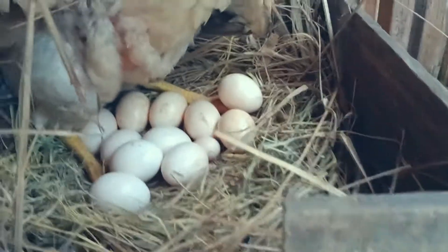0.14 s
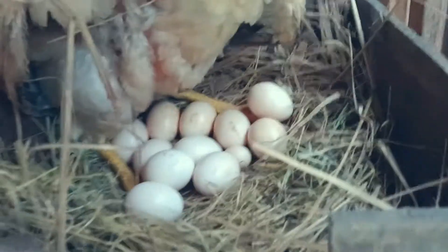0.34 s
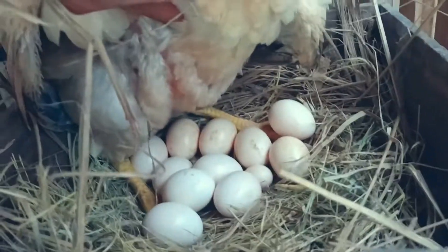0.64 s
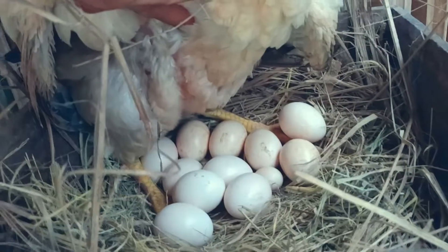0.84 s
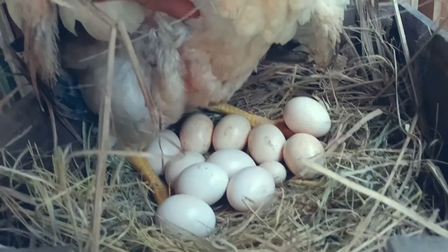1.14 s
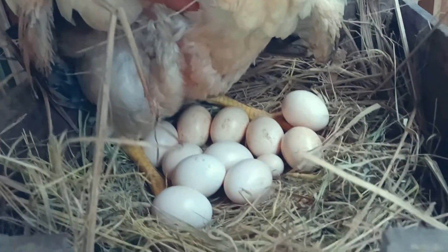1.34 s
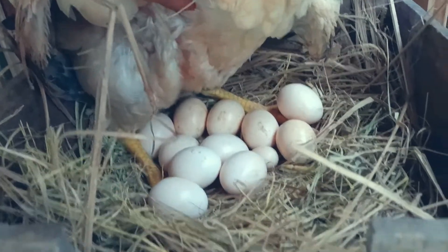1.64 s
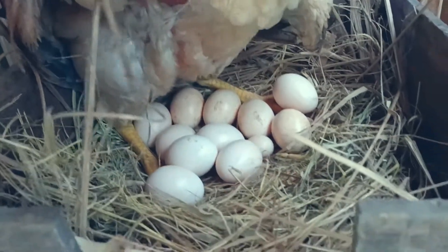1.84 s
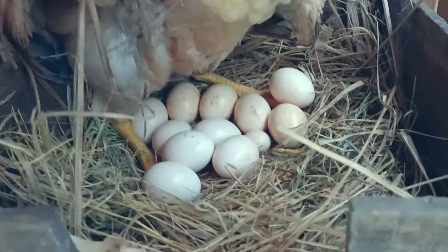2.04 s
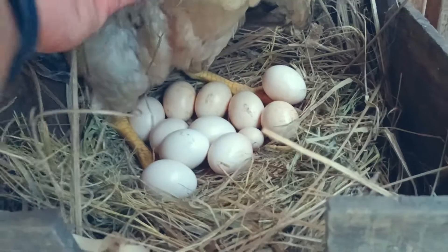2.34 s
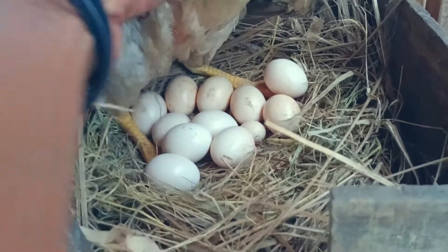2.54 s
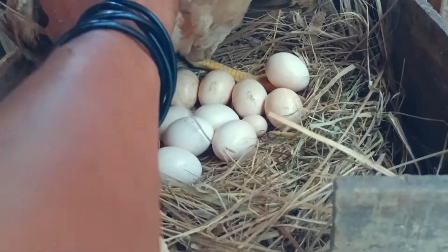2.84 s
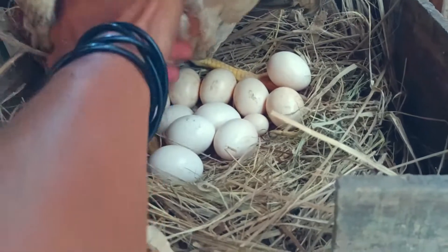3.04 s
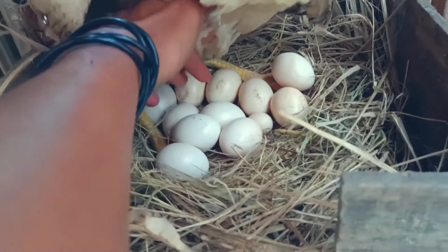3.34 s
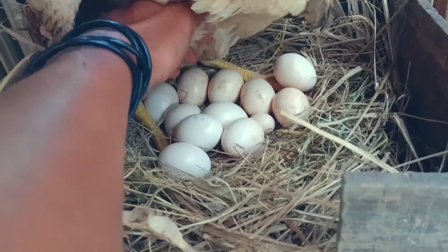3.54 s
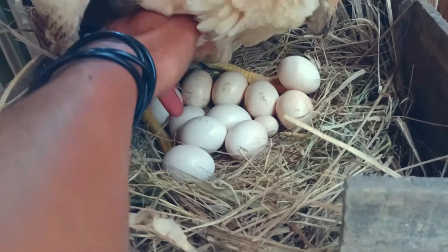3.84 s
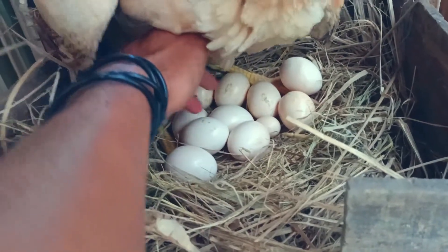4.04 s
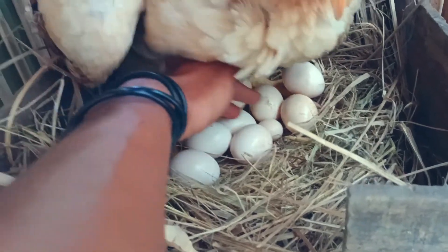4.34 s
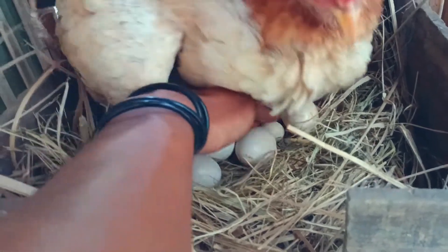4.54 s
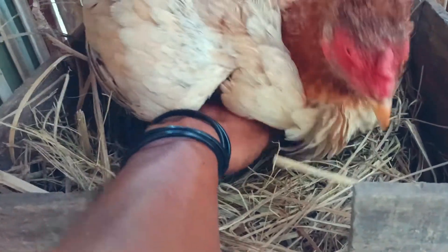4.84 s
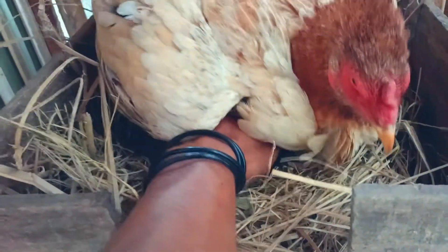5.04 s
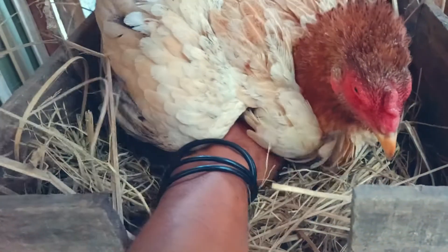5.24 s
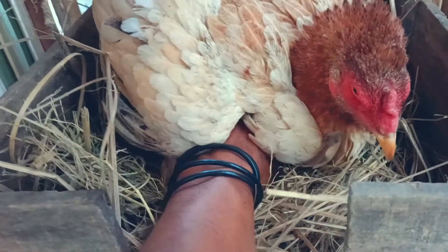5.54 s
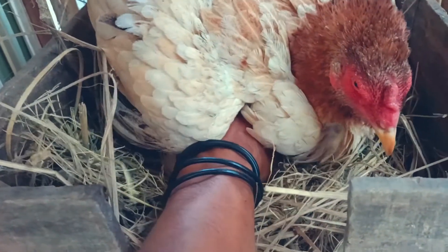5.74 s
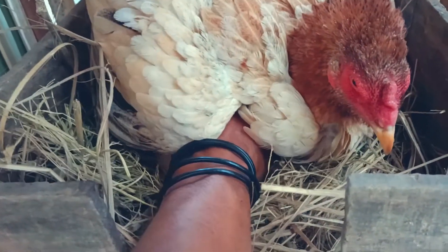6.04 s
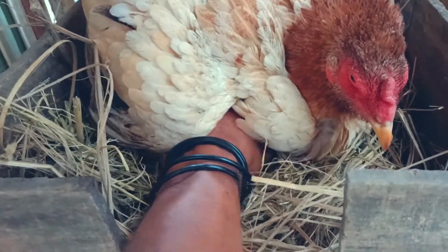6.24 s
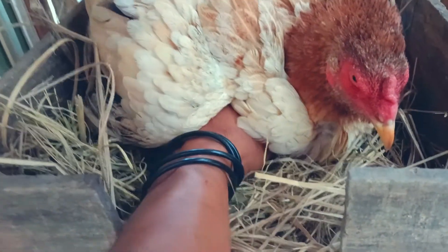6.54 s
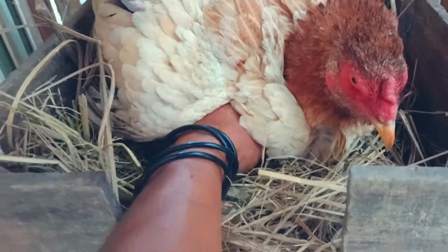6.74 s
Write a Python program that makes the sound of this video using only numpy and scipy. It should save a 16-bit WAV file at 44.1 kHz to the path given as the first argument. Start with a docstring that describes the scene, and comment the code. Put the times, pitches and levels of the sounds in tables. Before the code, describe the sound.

Heard from the edge of a wooden nest box, dry straw rustles and snaps close by throughout, over a faint low outdoor rumble with a throbbing drone. Thin, quavering chick peeps slide downward, clustered from 0.1 to 1.7 s, with stragglers at 2.2 and 3.3. A hen gives short, low, muffled clucks from 0.4 s, knocking at their onset. Soft board thuds come near 1.0, 1.6 and 3.3 s. At 1.9-2.2 she growls in a rapid rattle; a stronger growl at 2.6-2.9 adds nasal hiss and faint whistling. Distant drawn-out calls echo around 1.5, 1.8 and 3.6-3.8. Single clucks continue, harder and raspier after 4.8 s as she shifts slightly left, and straw stirring swells near 5. From 5.3 to 6.7 another chicken barks harshly, strongest at about 5.5, then weakening, among sharp straw snaps and last clucks.

```python
"""A hen clucks softly and growls in a wooden nest box, another chicken cackles harshly and chicks peep.
Straw crackles close by, the box thuds softly, and faint far-off calls come over a low outdoor rumble.
The voices are buzzing or humming tones shaped by throat and beak; chicks are sliding whistles.
Straw and rumble are shaped noise, the rumble with a throbbing drone; the thuds are ringing boards."""
import sys
import numpy as np
from scipy import signal
from scipy.fft import rfft, irfft, next_fast_len
from scipy.io import wavfile
from scipy.ndimage import uniform_filter1d, map_coordinates

SR = 44100
rng = np.random.default_rng(int(sys.argv[2]) if len(sys.argv) > 2 else 0)


def waveform_to_disk(signal):
    """Save audio, clipped to [-1, 1], as 16-bit WAV at the path in sys.argv[1]."""
    frames = np.transpose(np.atleast_2d(signal))
    scaled = np.clip(frames, -1, 1) * 32767
    samples = np.round(scaled).astype(np.int16)
    wavfile.write(sys.argv[1], SR, samples)


N = 304290

# rasp behind the shut beak, in clucks and growls: f/Hz, relative level/dB
GULLET = [(250, -72), (600, 12.5), (780, -4), (980, 1), (1200, -12), (1450, -39), (2200, -15), (2700, -28),
          (3200, -10), (4000, -49)]


def amp(db):
    """Turn decibels into a gain."""
    return 10 ** (np.asarray(db) / 20)


def unit(x):
    """Scale to an average strength (rms) of 1."""
    return x / np.sqrt(np.mean(x ** 2) + 1e-20)


def along(points, hz):
    """Read a curve of (f/Hz, value) points, joined by straight lines over log frequency."""
    f, v = np.transpose(points)
    return np.interp(np.log(hz + 1), np.log(f), v)


def curves(rows):
    """Give one value per sample for each column after the time."""
    s, *cols = np.transpose(rows)
    return [np.interp(np.arange(N) / SR, s, c) for c in cols]


def wobble(rate, size=N):
    """A smooth random curve through rate random points a second."""
    return map_coordinates(rng.standard_normal(size // 8), [np.arange(size) * rate / SR], mode="wrap")


def filtered(x, response):
    """Shape x by a response that depends on frequency."""
    n = x.shape[-1]
    m = next_fast_len(n + 4096)  # spare room for the ringing
    return irfft(rfft(x, m) * response(np.fft.rfftfreq(m, 1 / SR)), m)[..., :n]


def coloured(x, spectrum):
    """Shape x by (f/Hz, level/dB) points and scale it to rms 1."""
    return unit(filtered(x, lambda hz: amp(along(spectrum, hz))))


def resonances(modes, f):
    """Response of several things ringing together, with alternating signs."""
    total = 0
    for k, (c, w, db) in enumerate(modes):
        total = total + (-1) ** k * amp(db) * 1j * f * w / (c * c - f * f + 1j * f * w)
    return total


def band(f, hz, width):
    """Response of one resonance passed twice, which makes its sides steep."""
    return (1j * f * width / (hz * hz - f * f + 1j * f * width)) ** 2


def spread(pair, side_db):
    """Use two unrelated signals as the middle and side of a stereo pair."""
    side = amp(side_db) * pair[1]
    return unit(np.array([pair[0] + side, pair[0] - side]))


def placed(x, lead_s, left_db):
    """Place x in stereo: the left channel has it earlier and louder by these amounts."""
    sides = np.array([[.5], [-.5]])
    return amp(left_db * sides) * filtered(x, lambda f: np.exp(2j * np.pi * f * lead_s * sides))


def add(track, s, sound):
    """Mix a sound into a track at time s."""
    part = track[..., max(round(s * SR), 0):][..., :sound.shape[-1]]
    part += sound[..., :part.shape[-1]]


def echo(x, decay):
    """Stereo echo of a space: a noise tail in which each frequency dies at its own speed."""
    hz, t, z = signal.stft(rng.standard_normal((2, SR // 3)), SR, nperseg=256)
    fading = z * amp(-60 * t / along(decay, hz)[:, None])
    tail = signal.istft(fading, SR, nperseg=256)[1]
    wet = signal.fftconvolve(x[None], tail, axes=1)[:, :len(x)]
    # each channel gets the energy of x
    return wet * np.linalg.norm(x) / np.linalg.norm(wet, axis=1, keepdims=True)


def outdoors(level_db=4.0, drone_db=-2.0, drone_hz=178, throb_rate=19.0, throb=0.97):
    """A low, nearly mono rumble of noise, with a drone throbbing about 19 times a second."""
    # colour of the rumble: f/Hz, relative level/dB
    rumble_colour = [(20, -17), (42, -1), (65, -2), (100, -2), (150, 4.5), (200, -2), (240, -5.5),
                     (350, -13.5), (600, -11), (800, -28), (1200, -34.5), (2500, -33.5), (6000, -95)]
    # slow rise and fall of rumble and drone: t/s, relative level/dB
    rumble_level = [(0.0, -52), (0.44, -50.5), (1.4, -53), (1.73, -49), (2.82, -52.5), (3.13, -54),
                    (4.48, -54.5), (4.86, -52), (6.42, -54), (6.9, -52)]
    rumble = coloured(spread(rng.standard_normal((2, N)), side_db=-20), rumble_colour)
    beat = 1 + throb * np.sin(2 * np.pi * np.cumsum(throb_rate + wobble(1.6)) / SR)
    tone = np.sin(2 * np.pi * np.cumsum(drone_hz + 20 * wobble(50)) / SR)
    drone = tone * beat * amp(1.1 * wobble(20))
    return amp(curves(rumble_level)[0]) * (amp(level_db + wobble(10)) * rumble + amp(drone_db) * drone)


def far_chickens(slope_db=15, upper_slope_db=16, sag=0.011):
    """Held notes whose harmonics fall away on both sides of two resonances; only their echo arrives."""
    # drawn-out calls: start t/s, length/s, relative level/dB, base pitch f/Hz, lower resonance f/Hz,
    # upper resonance f/Hz, upper resonance relative level/dB, quaver (share of the pitch)
    far_calls = [(1.467, 0.12, -49, 491.4, 980, 2000, -11, 0.066),
                 (1.806, 0.04, -52.5, 703, 1300, 2100, -30, 0.038),
                 (3.555, 0.17, -41, 382, 830, 2770, -4.5, 0.0245),
                 (3.835, 0.024, -46, 384, 600, 2300, -21, 0.046)]
    # echo of the yard: f/Hz, time to die by 60 dB/s
    yard = [(500, 0.35), (2300, 0.32), (5000, .22)]
    odd_db = -16  # the odd harmonics from the fifth up are weaker than the even ones
    out = np.zeros(N)
    for s, length, db, hz, lower_hz, upper_hz, upper_db, quaver in far_calls:
        swell = signal.windows.tukey(round(length * SR))
        size = len(swell)
        pitch = hz * (1 + quaver * wobble(160.5, size=size) - sag * np.linspace(-1, 1, size))
        phase = 2 * np.pi * np.cumsum(pitch) / SR
        note = np.zeros(size)
        for k in range(2, 15):
            lower = amp(-slope_db * abs(np.log2(k * hz / lower_hz)))
            upper = amp(upper_db - upper_slope_db * abs(np.log2(k * hz / upper_hz)))
            note += (lower + upper) * amp(odd_db * (k > 4) * (k % 2)) * np.sin(k * phase)
        add(out, s, amp(db) * swell * unit(note))
    return echo(out, yard)


def chicks(direct_db=-10, coop_db=1.0, overtone_db=-21, grow_db=4, flutter_db=4.5):
    """Quavering, broken whistles that grow as they slide down, some ending in a steep hook, blurred by the coop."""
    # peeps: start t/s, slide length/s, first f/Hz, last f/Hz, relative level/dB,
    # closing hook length/s, quaver (share of the pitch)
    peep_rows = [(0.099, 0.15, 4124, 2193, -47, 0.0014, 0.028), (.325, 0.15, 3740, 2900, -59, 0.049, 0.019),
                 (0.658, 0.18, 5250, 4860, -52.5, 0.012, 0.055),
                 (0.755, 0.12, 3750, 3000, -42, 0.016, 0.023), (.82, .11, 3620, 3530, -43, 0.003, 0.0029),
                 (.921, .11, 3450, 2797, -43.5, 0.003, 0.013), (1.079, 0.066, 3460, 2760, -42, 0, 0.013),
                 (1.185, 0.12, 3990, 3344, -43.5, 0.0037, 0.0091),
                 (1.335, 0.11, 3350, 2340, -43, 0.00076, 0.01), (1.627, 0.058, 3610, 2300, -41, 0, 0.06),
                 (2.183, 0.045, 3500, 2445, -49, 0.038, 0.014),
                 (3.311, 0.235, 4560, 3037, -47.5, 0.027, 0.0138)]
    # echo of the coop: f/Hz, time to die by 60 dB/s
    coop = [(300, 0.23), (700, 0.14), (3000, 0.2), (6000, 0.17), (14000, 0.36)]
    hook_hz, hook_db = 1825, 19.5  # a hook plunges to this pitch and grows by this much
    out, t = np.zeros((2, N)), np.arange(SR // 2) / SR
    for s, length, first_hz, last_hz, db, hook_s, quaver in peep_rows:
        slide = np.minimum(t / length, 1)
        u = np.minimum(t / (length + hook_s), 1)  # progress through the whole peep
        hook = np.clip((t - length) / hook_s, 0, 1) if hook_s > 0 else 0
        pitch = first_hz + (last_hz - first_hz) * slide + (hook_hz - last_hz) * hook
        phase = 2 * np.pi * np.cumsum(pitch * (1 + quaver * wobble(497.0, size=len(t)))) / SR
        breaks = flutter_db * np.tanh(wobble(82.6, size=len(t)))
        swell = np.sqrt(4 * u * (1 - u)) * amp(db + grow_db * slide + hook_db * np.sqrt(hook) + breaks)
        peep = swell * (np.sin(phase) + amp(overtone_db) * np.sin(2 * phase))
        add(out, s, amp(direct_db) * peep + amp(coop_db) * echo(peep, coop))
    return out


def bumps(level_db=24):
    """Soft, very short pushes set the boards of the box thudding."""
    # bumps against the nest box: t/s, relative level/dB
    bump_rows = [(1.028, -54), (1.564, -44), (1.599, -54), (1.709, -57), (3.289, -57)]
    # ringing boards of the box: f/Hz, width/Hz, relative level/dB
    boards = [(182, 13.6, 24), (413, 40, 14), (626, 520, -4)]
    blows = np.zeros(N)
    for s, db in bump_rows:
        add(blows, s, amp(db + level_db) * signal.windows.hann(40) / 2)
    return filtered(blows, lambda f: resonances(boards, f))


def straw(snap_db=-4, t60=0.09, small_t60=0.093, crackle_db=-5, spikiness=3.1, rustle_db=-1.5):
    """Snapping stalks are fading bursts of uneven noise, over a fine rustle of straw and feathers."""
    # the loudest snaps: t/s, relative level/dB, body of the stalk relative level/dB
    loud_snaps = [(0.032, -25.5, -72), (0.046, -27, -60), (0.078, -34, -42), (0.191, -34.5, -40),
                  (0.728, -37, -8), (0.1217, -27, -54), (0.535, -34.5, -31), (1.0344, -24.5, 3),
                  (1.054, -27.5, 1), (1.2922, -26.5, 5.5), (1.479, -33.5, -11), (1.7062, -33, -1),
                  (2.1148, -23, -4.5), (2.22, -24.5, -7), (2.257, -30.5, -11), (2.692, -26.5, -9),
                  (3.294, -23, -10.5), (3.352, -31.5, -22), (4.015, -32.5, -12), (4.4477, -28, -13),
                  (4.495, -27, -7.5), (5.893, -24.5, -8), (6.1828, -21.5, 2), (6.435, -21, 5.5),
                  (6.569, -27, 0)]
    # colour of the fine crackle: f/Hz, relative level/dB
    crackle_colour = [(530, -15), (900, -17), (1440, -29), (1620, 27.5), (1960, -13), (2710, 21), (7700, 7),
                      (10800, 8), (14500, 18), (15800, -56)]
    # colour of the rustle: f/Hz, relative level/dB
    rustle_colour = [(40, -24), (100, 0), (530, 12.5), (900, 2.5), (1340, 0), (1760, -6), (2030, 1),
                     (2650, 2.5), (4380, 2.5), (7700, -1), (11400, -2), (14900, -6), (15800, -6)]
    # stirring of the straw: t/s, relative level/dB
    stirring = [(0.0, -55), (0.33, -57), (0.86, -55.5), (1.94, -57), (2.48, -54.5), (2.75, -53.5),
                (3.0, -55), (3.48, -52), (3.55, -48), (3.8, -64.5), (3.96, -54.5), (4.11, -52), (4.63, -51),
                (4.92, -49.5), (5.15, -47.5), (5.57, -50), (5.92, -56), (6.9, -51.5)]
    snap_top_db, top_per_body = -4, 0.21  # the thicker the stalk, the duller its snap
    # lesser stalks give way at random; their level follows the stirring
    small_per_s, small_snap_db, small_body_db = 32, 10.5, -17
    snaps, t = np.zeros((2, N)), np.arange(SR // 12) / SR
    stir_db, = curves(stirring)
    all_snaps = [(*row, t60) for row in loud_snaps]
    for when, size, body in rng.random((round(small_per_s * N / SR), 3)):
        db = stir_db[int(when * N)] + small_snap_db + 9 * (size - .5)
        all_snaps.append((when * N / SR, db, small_body_db + 20 * (body - .5), small_t60))
    for s, db, mid_db, decay in all_snaps:
        top_db = snap_top_db - top_per_body * mid_db
        fractures = spread(rng.standard_normal((2, len(t))), side_db=0.0) * amp(1.5 * wobble(880, size=len(t)))
        stalk = [(50, mid_db - 18), (200, mid_db + 9.5), (1500, mid_db + 1.0), (2600, mid_db + 7.5),
                 (4500, 6.5), (8000, 0.5), (10500, top_db + 2.5), (15000, top_db)]
        fade = amp(db + snap_db - 60 * t / decay) * (1 - np.exp(-(t / 0.0025) ** 2))
        add(snaps, s - .004, fade * coloured(fractures, stalk))
    # about 500 tiny clicks a second, a few of them much stronger
    strengths = np.exp(spikiness * np.clip(rng.standard_normal(N), -2, 2))
    grains = (rng.random(N) < 500 / SR) * strengths * rng.standard_normal((2, N))
    crackle = coloured(grains * amp(6.6 * wobble(12)), crackle_colour)
    rustle = coloured(spread(rng.standard_normal((2, N)), side_db=0.0), rustle_colour)
    rustle = rustle * amp(5.0 + 2.17 * wobble(45))
    return snaps + amp(stir_db + rustle_db) * (rustle + amp(crackle_db) * crackle)


def cackles(rasp=1.86, jitter=.085, sag=0.055, direct_db=-3, coop_db=-1.0, rattle_db=3.0, rattle_rate=190,
            closing_db=3, ending=9):
    """Harsh barks: rattling pulses and puffed noise ring resonances; the throat grows as the beak closes."""
    # barks of the other chicken: start t/s, length/s, base pitch f/Hz, roughness (0-1), then f/Hz and
    # relative level/dB for each of throat, mouth, tongue and gape, last beak overtones relative level/dB
    cackle_rows = [(5.293, 0.067, 230.7, .9, 474, -34.5, 675, -24, 1860, -35, 3130, -37.5, -50),
                   (5.456, 0.044, 264.8, 0.73, 558, -20, 844, -18, 2130, -22.5, 2770, -22, -26),
                   (5.682, 0.025, 230.9, .45, 462, -22, 824, -17, 2130, -29, 2450, -28, -34),
                   (5.823, 0.043, 243.6, 0.57, 510, -23.5, 815, -24.5, 1810, -30.5, 2190, -43, -36.5),
                   (5.971, 0.03, 212.8, 0.51, 463, -27.5, 786, -28, 1790, -40, 2700, -39.5, -44),
                   (6.115, 0.038, 307.4, 0.78, 619, -27.5, 730, -27.5, 1650, -42, 2780, -42.5, -52),
                   (6.292, 0.035, 306.5, .6, 478, -44, 607, -34.5, 1940, -54, 2830, -56, -61),
                   (6.504, 0.035, 340, 0.48, 465, -48, 670, -31.5, 1920, -50.5, 2750, -51.5, -61),
                   (6.673, .036, 288.4, 0.53, 398, -46, 542, -40.5, 1890, -61, 2750, -60, -60)]
    # overtones of the open beak at the second bark: f/Hz, width before steepening/Hz, relative level/dB
    beak = [(1247, 150, 5), (4330, 260, 4.5), (5670, 650, -2), (7760, 1100, -15), (11500, 3100, -17)]
    # echo of the coop: f/Hz, time to die by 60 dB/s
    coop = [(300, 0.23), (700, 0.14), (3000, 0.2), (6000, 0.17), (14000, 0.36)]
    # widths before steepening, in Hz
    throat_width, mouth_width, tongue_width, gape_width = 103, 295, 520, 500
    beak_rise_per_s = 0.12  # the overtones creep up from bark to bark, as a share of their pitch
    attack_share = .2  # rise time as a share of the bark's length
    out, t = np.zeros((2, N)), np.arange(SR // 3) / SR
    for (s, length, hz, rough, throat_hz, throat_db, mouth_hz, mouth_db,
         tongue_hz, tongue_db, gape_hz, gape_db, beak_db) in cackle_rows:
        through = np.clip(t / length - .5, -1, 1)
        cycles = np.cumsum(hz * (1 + jitter * rough * wobble(350, size=len(t)) - sag * through)) / SR
        pulses = unit(np.diff(np.floor(cycles), prepend=0))  # one click a cycle
        air = unit(rng.standard_normal(len(t)) * np.exp(-3 * (cycles % 1)))  # one puff a cycle
        swell = (1 - np.exp(-(t / (attack_share * length)) ** 2)) / (1 + (t / length) ** ending)
        rattle = amp(rattle_db * np.tanh(wobble(rattle_rate, size=len(t))))
        source = swell * (pulses + rasp * rough * air) * rattle
        stretch = 1 + beak_rise_per_s * (s - cackle_rows[1][0])
        overtones = filtered(source, lambda f: sum(amp(db) * band(f, stretch * c, w) for c, w, db in beak))
        closing = source * amp(closing_db * through)
        throat = filtered(closing, lambda f: band(f, throat_hz, throat_width))
        bark = amp(beak_db) * unit(overtones) + amp(throat_db) * unit(throat)
        for c, w, db in [(mouth_hz, mouth_width, mouth_db), (tongue_hz, tongue_width, tongue_db),
                         (gape_hz, gape_width, gape_db)]:
            bark += amp(db) * unit(filtered(source, lambda f: band(f, c, w)))
        bark *= np.sqrt(np.mean(swell ** 2))
        direct = placed(bark, lead_s=0.00039, left_db=0.5)
        add(out, s, amp(direct_db) * direct + amp(coop_db) * echo(bark, coop))
    return out


def knock(t):
    """The jolt as the syrinx (the bird's voice box) opens; its ring is never quite the same."""
    # chest and gullet ringing: base f/Hz, relative level/dB, time to die by 60 dB/s
    knock_modes = [(214, -9.5, 0.11), (390, -14, 0.025), (767, 1, 0.019), (965, -6, 0.04)]
    chance = rng.standard_normal((len(knock_modes), 2))
    ring = np.zeros(len(t))
    for (hz, db, t60), (loud, sharp) in zip(knock_modes, chance):
        ring += amp(db + 2.4 * loud - 60 * t / t60) * np.sin(2 * np.pi * hz * (1 + 0.06 * sharp) * t)
    return ring * (1 - np.exp(-t / 0.0043))


def hum(pitch, rough, edge_db):
    """Syrinx harmonics through the shut beak: the second rings in the throat, the others need a hard push."""
    # throat with the beak shut: f/Hz, relative level/dB
    throat = [(130, 1), (220, 3), (260, -12.5), (310, -23), (400, -3.5), (510, 7.5), (630, 4.5),
              (780, -21.5), (1030, -41), (1300, -42), (1700, -51), (2600, -38)]
    phase = 2 * np.pi * np.cumsum(pitch * (1 + rough * wobble(438.7, size=len(pitch)))) / SR
    return sum(amp(along(throat, k * pitch) + edge_db * (k != 2)) * np.sin(k * phase) for k in range(1, 9))


def clucks(flutter_db=5.5, onset_db=9, rise=2.43, fall=2.34, knock_db=0, rasp_db=-19):
    """Each cluck starts with a knock, hard, rough and a little flat, then narrows to the throat's ring and shuts."""
    # closed-beak clucks: middle t/s, length at half height/s, relative level/dB, base pitch f/Hz
    cluck_rows = [(0.369, 0.028, -25, 251), (0.542, 0.025, -21, 257), (0.775, 0.021, -18, 262.4),
                  (1.722, 0.029, -30, 210), (1.894, 0.021, -18.5, 270), (2.521, 0.025, -15, 290.7),
                  (2.57, 0.026, -17.5, 271.2), (2.932, 0.021, -18, 277), (3.432, 0.024, -19, 265.4),
                  (3.653, 0.025, -18.5, 275), (4.527, 0.023, -22.5, 259.1), (4.66, 0.017, -18.5, 270.5),
                  (4.869, 0.02, -21.5, 261), (5.115, 0.021, -17.5, 272.8), (5.613, 0.02, -20, 266),
                  (5.965, 0.018, -17, 273.3), (6.449, 0.016, -18.5, 253.5), (6.804, 0.021, -19, 279.8)]
    # once the hand is right under her, she pushes her clucks harder
    upset_s, calm_hard_db, upset_hard_db = 4.76, 4.5, 11
    out, t = np.zeros(N), np.arange(SR // 8) / SR - 1 / 16  # t is 0 at the middle
    for s, length, db, hz in cluck_rows:
        hard_db = upset_hard_db if s > upset_s else calm_hard_db
        swell = np.exp2(-np.abs(2 * t / length) ** np.where(t < 0, rise, fall))
        pitch = hz * (1.02 - .09 / (1 + np.exp((t + .005) / .003)))
        edge_db = hard_db + onset_db * np.clip(-t / length, -.4, .8)
        rough = .025 + .06 * np.clip(-t / length, 0, 1)
        flutter = amp(flutter_db * np.tanh(wobble(187.4, size=len(t))))
        note = swell * flutter * hum(pitch, rough, edge_db)
        note = note * np.linalg.norm(swell) / np.linalg.norm(note)
        rasp = swell * coloured(rng.standard_normal(len(t)), GULLET) * amp(rasp_db + edge_db - calm_hard_db)
        add(out, s + t[0], amp(db) * (note + rasp))
        add(out, s - .5 * length, amp(db + knock_db) * knock(t - t[0]))
    return out


def growl(throb_s=.0195, attack_s=0.00508, release_s=0.0042, overlap_s=0.0031, push_s=0.013, t60=0.13, sag=0.3,
          onset_db=9, soft_db=-6, level_db=5.0, fade_db=2.5, flatten=0.032, scatter_s=0.00102, flutter_db=3.0,
          rough=0.045, rasp_db=-21):
    """Surges break into throbs, weaker and flatter in turn; each knocks, sags and is cut off near the next."""
    # surges that run together into two growls: start t/s, length/s, relative level/dB,
    # base pitch f/Hz, hardness (rasp and knock) relative level/dB
    surges = [(1.923, 0.021, -28.5, 273, -10), (1.944, 0.019, -23.5, 291, 4.5),
              (1.963, 0.035, -23, 281, -13), (2.001, 0.04, -23, 297, -11), (2.041, 0.016, -28.5, 280, -10),
              (2.056, 0.039, -20.5, 296, -10), (2.1, 0.015, -21.5, 283, 0), (2.117, 0.022, -21, 297, -13),
              (2.136, 0.027, -21, 295.6, -8), (2.163, 0.019, -26, 271, 0), (2.588, 0.017, -25.5, 274, -5),
              (2.603, 0.036, -18.5, 316, 0), (2.642, 0.041, -18, 308, -2), (2.687, 0.012, -19.5, 300, 1),
              (2.699, 0.026, -19.5, 303, 6.5), (2.724, 0.019, -18.5, 318, -18),
              (2.739, 0.042, -13.5, 325, -2), (2.781, 0.015, -18.5, 305, -0.5),
              (2.797, 0.019, -18.5, 300.3, -1), (2.816, 0.02, -14, 332.6, 4), (2.837, .016, -24, 300, 4),
              (2.851, 0.034, -17.5, 298, 4), (2.882, 0.039, -18, 291, 2)]
    out, t = np.zeros(N), np.arange(SR // 20) / SR
    push = np.exp(-t / push_s)
    for start, length, db, hz, hard_db in surges:
        throbs = max(round(length / throb_s), 1)
        chance = rng.standard_normal(8)
        late = scatter_s * chance[:throbs] * (np.arange(throbs) > 0)  # the first throb is on time
        starts = start + np.arange(throbs) * length / throbs + late
        gaps = np.diff(starts, append=start + length)
        for k, (s, gap) in enumerate(zip(starts, gaps)):
            gate = np.clip(t / attack_s, 0, 1) * np.clip((gap + overlap_s - t) / release_s, 0, 1)
            swell = amp(-60 * t / t60) * np.sin(gate * np.pi / 2) ** 2
            pitch = hz * (1 - flatten * k) * (1 + sag * (push - .45))
            ring = unit(hum(pitch, rough, soft_db + onset_db * push))
            rasp = amp(rasp_db + hard_db) * coloured(rng.standard_normal(len(t)), GULLET)
            throb = swell * (ring + rasp) + amp(hard_db - 11) * knock(t)
            flutter = flutter_db * np.tanh(wobble(263, size=len(t)))
            add(out, s - attack_s / 2, amp(db + level_db - fade_db * k + flutter) * throb)
    return out


def effort(x):
    """Follow how strong a voice is from moment to moment."""
    return np.sqrt(np.abs(uniform_filter1d(x ** 2, size=120)))


def hen(hiss_db=-31, rasp_db=-28, puff_db=-13, nest_db=-16):
    """Her clucks and growls, with hiss and a thin whistle from the nostrils, ringing briefly in the box."""
    # puffs of nasal whistle late in the second growl: middle t/s, length at half height/s, peak level/dB
    whistle_rows = [(2.785, .012, -43.5), (2.822, 0.012, -36.5), (2.847, .009, -39), (2.861, 0.015, -36),
                    (2.883, 0.0083, -35), (2.899, .015, -34.5), (2.932, 0.017, -38)]
    # colour of the nostril hiss: f/Hz, relative level/dB
    nostrils = [(200, -39), (900, 19), (1400, 16), (2100, 7.5), (2600, 5.5), (3150, 19.5), (3600, -18),
                (4200, 18), (5200, 6.5), (6200, 15), (7000, -10), (7600, 12), (8500, -1), (15000, -50)]
    # ring of the nest box: f/Hz, time to die by 60 dB/s
    nest = [(200, 0.38), (560, 0.14), (1200, 0.28), (8000, .06)]
    whistle_hz, whistle_quaver_hz = 3070, 34.6
    stand_s = 4.9  # she gets up and shifts from right of centre to the left
    notes, roll, t = clucks(), growl(), np.arange(N) / SR
    puffs = np.zeros(N)
    for s, length, db in whistle_rows:
        puffs += amp(db) * np.exp2(-np.minimum((2 * (t - s) / length) ** 2, 60))
    whistle = np.sin(2 * np.pi * np.cumsum(whistle_hz + whistle_quaver_hz * wobble(500)) / SR)
    voice = notes + roll + puffs * whistle
    # the growl forces more air through the nostrils than a cluck does
    flow = amp(hiss_db) * effort(notes) + amp(rasp_db) * effort(roll) + amp(puff_db) * puffs
    breath = coloured(spread(rng.standard_normal((2, N)), side_db=2.0), nostrils)
    hiss = flow * amp(6.5 * np.tanh(wobble(160))) * breath
    ring = unit(echo(voice, nest)) * np.std(voice)
    standing = np.clip((t - stand_s) / .1, 0, 1)
    sitting_voice = placed(voice * (1 - standing), lead_s=-.00007, left_db=0)
    standing_voice = placed(voice * standing, lead_s=.00012, left_db=1.8)
    return sitting_voice + standing_voice + hiss + amp(nest_db) * ring


def scene():
    """Everything heard from the edge of the nest."""
    return outdoors() + far_chickens() + chicks() + bumps() + straw() + cackles() + hen()


def record(dry):
    """Let through only what lies below a sharp upper limit."""
    top_hz = 15800
    return filtered(dry, lambda hz: hz < top_hz)


dry = scene()
out = record(dry)
waveform_to_disk(out)
```